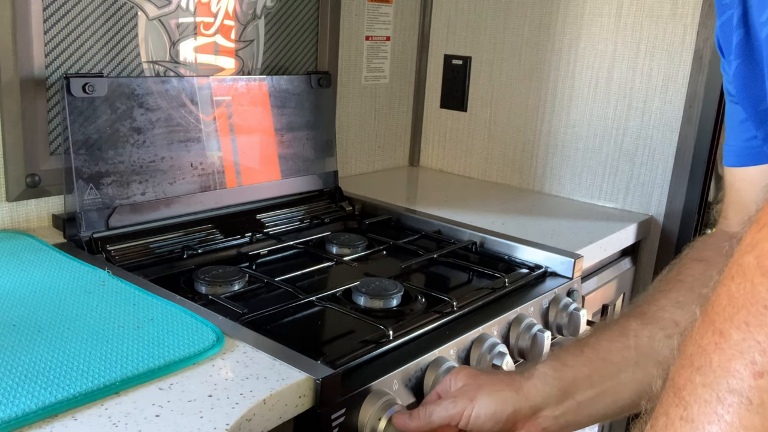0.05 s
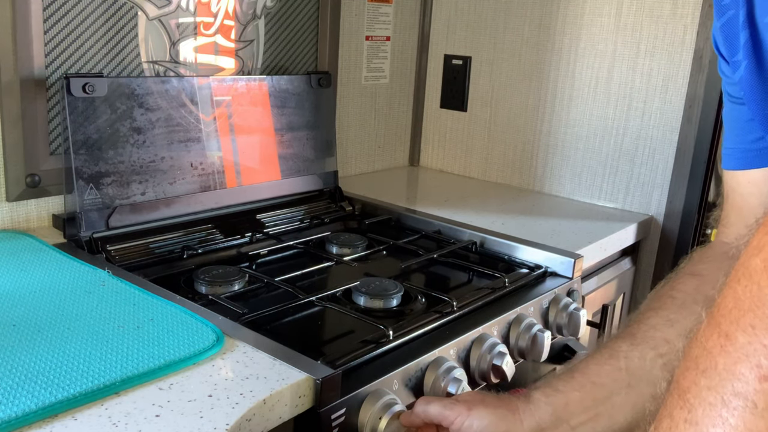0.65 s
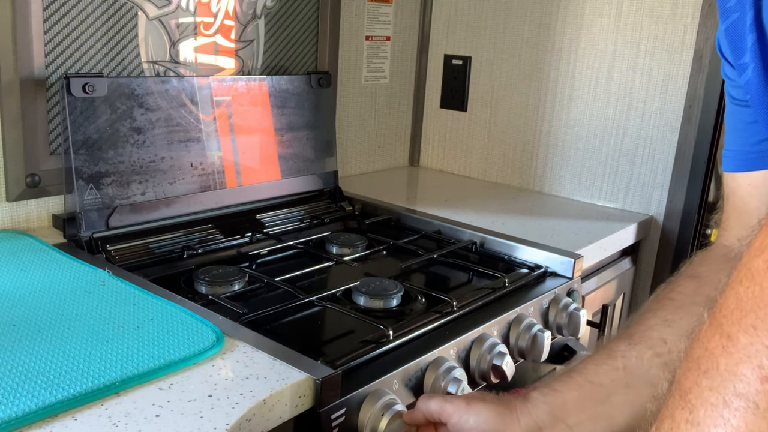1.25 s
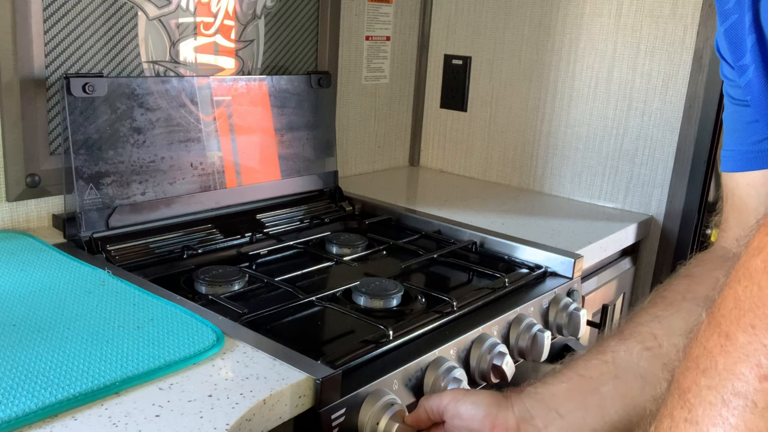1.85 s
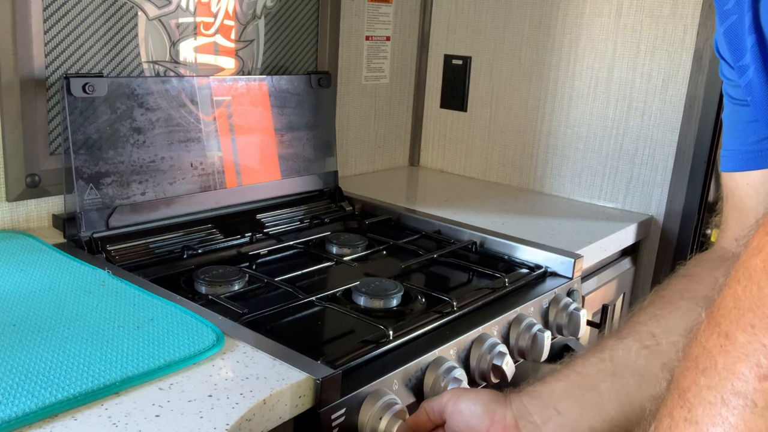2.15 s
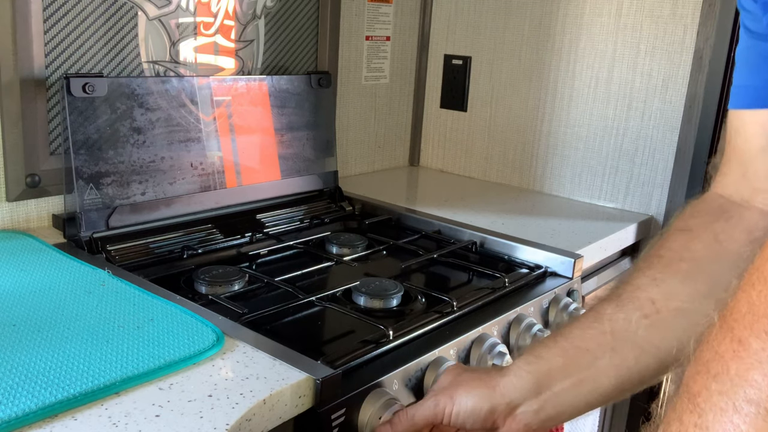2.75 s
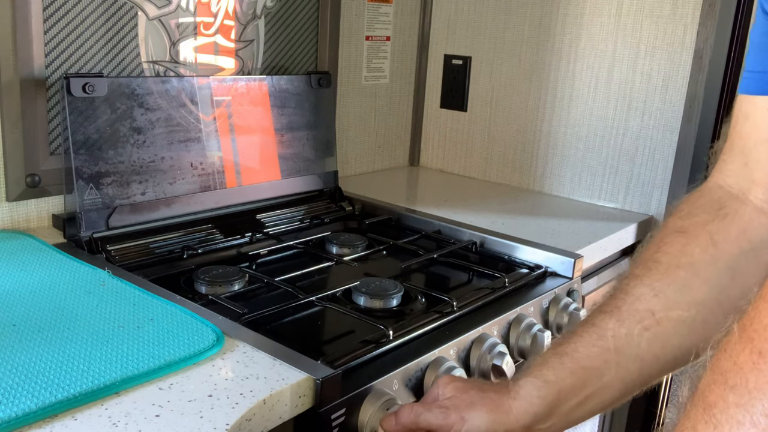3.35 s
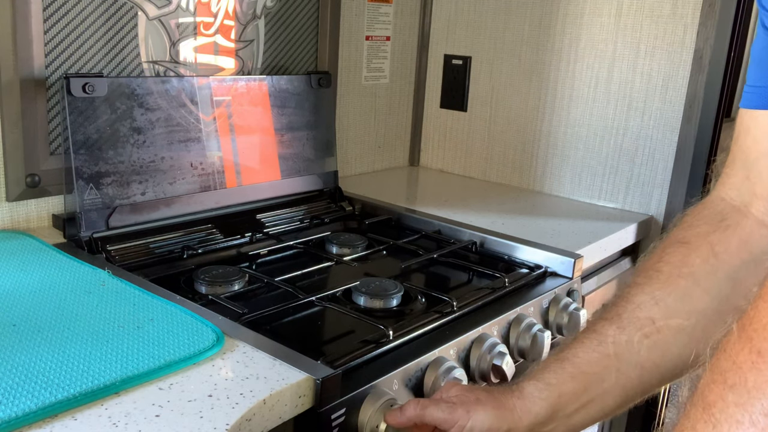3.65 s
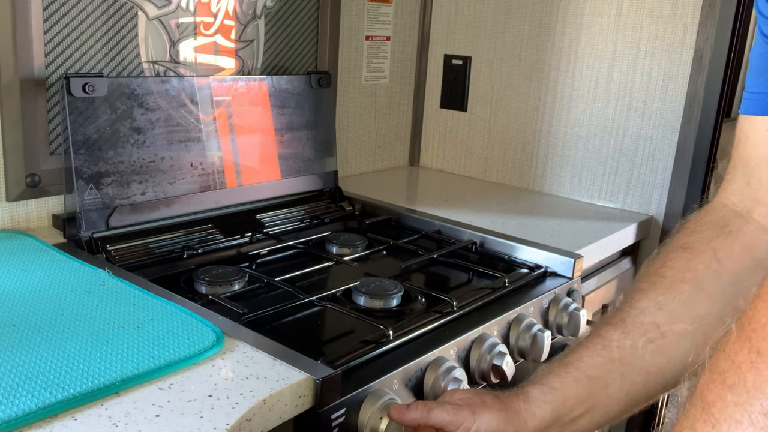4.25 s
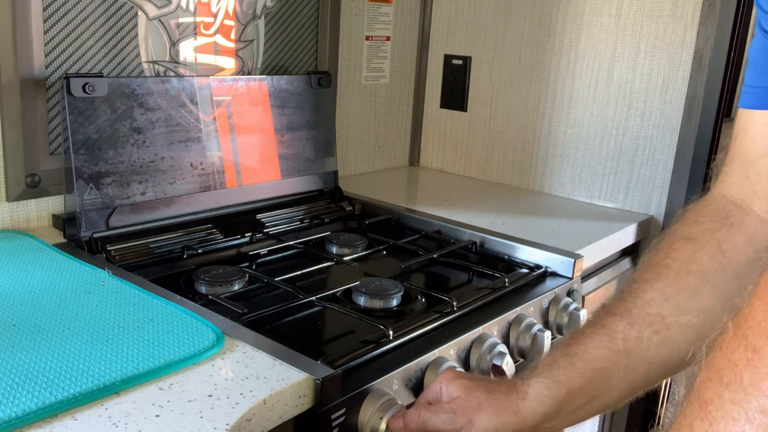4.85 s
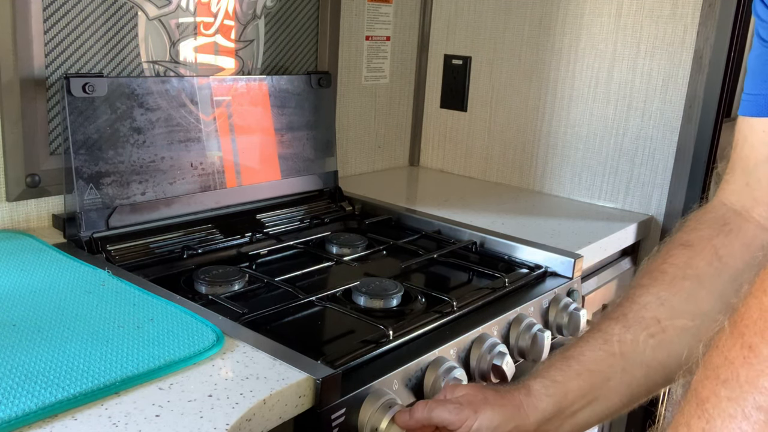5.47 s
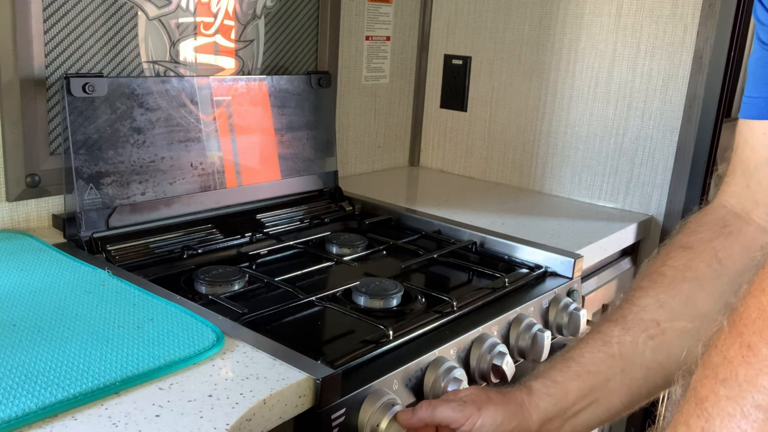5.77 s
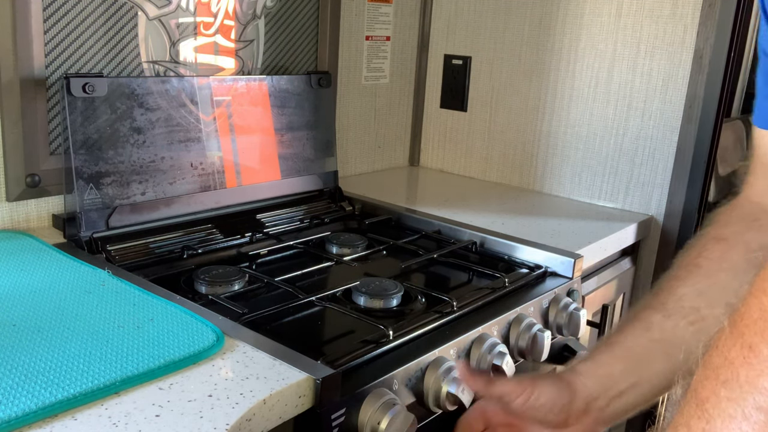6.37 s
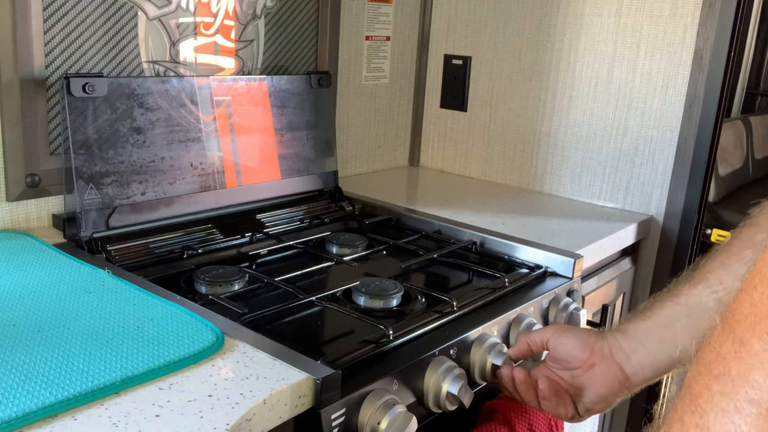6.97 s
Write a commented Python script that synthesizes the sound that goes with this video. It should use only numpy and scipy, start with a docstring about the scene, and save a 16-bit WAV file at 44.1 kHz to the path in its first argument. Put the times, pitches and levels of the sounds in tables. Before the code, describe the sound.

Four sharp, bright snaps of a gas range igniter are heard up close in a cramped kitchen, each with a brief metallic rattle and a slight ring. Softer clicks of the spring resetting come between them, with very faint finger scuffs on a knob. Underneath run a faint burner hiss, a quiet fan and moving air, with low floor thumps and rumble mostly in the middle.

```python
"""Gas range igniter, close up.

In a cramped kitchen, near the microphone, a piezo igniter is snapped four times while a hand holds a
burner knob open. Each hammer blow cracks through the sheet-metal top and leaves the grates ringing;
the spring resets with a light click. Gas hisses softly from the burner. Behind it a fan hums, air
moves, and dull bumps and rumble come through the floor."""
import sys
import numpy as np
from scipy import signal
from scipy.fft import rfft, irfft
from scipy.io import wavfile

SR = 44100
rng = np.random.default_rng(int(sys.argv[2]) if len(sys.argv) > 2 else 0)


def wav_record(signal):
    """Record a signal, one row per channel, as 16-bit PCM in the file named by sys.argv[1]."""
    frames = np.transpose(np.atleast_2d(signal))
    bounded = np.clip(frames, -1, 1)
    # unit amplitude maps onto the largest positive 16-bit level
    quanta = np.round(bounded * 32767).astype(np.int16)
    wavfile.write(sys.argv[1], SR, quanta)


N = 309141
TIME = np.arange(N) / SR

# Hammer blows. Each row: start in seconds; relative level, bass, treble and first crack in dB; favoured
# resonance in Hz, its lift in dB before scaling; favoured grate wire in Hz, its level in dB.
HAMMER_BLOWS = [(0.5052, 0, -1.5, -2, 4, 2530, 3.5, 1443, -61),
                (1.902, -3, 3.5, 1.5, 3, 1880, -1.5, 1478, -61.5),
                (3.8534, -2, -1.5, -0.5, 1.5, 1466, -3, 1445, -55.5),
                (5.9819, -2.5, 0.5, 0, -1.5, 1720, 1, 1254, -54)]
# Light clicks of spring and knob. Each row: as for a hammer blow, without the grate wire.
SPRING_CLICKS = [(1.1931, -24.5, -2, 10, -1, 1870, -3), (2.5172, -36.5, 21, 11.5, -29, 940, 12.5),
                 (3.05, -32.5, 2.5, 11.5, -0.5, 1440, 10.5), (5.0426, -28.5, -13.5, 9, 1.5, 1400, 9.5)]
# Colour of a blow and of a click. Each row: frequency in Hz, gain in dB.
BLOW_COLOUR = [(40, -24), (130, 2), (350, 1), (800, -7.5), (1200, 5), (2000, 1), (3200, -2), (5400, 2.5),
               (7200, -4.5), (10500, 3.5), (13000, -0.5), (14300, -3), (16000, -2.5)]
CLICK_COLOUR = [(100, 7.5), (350, 1.5), (800, -2), (1300, 11.5), (2000, 4), (3200, -8.5), (4800, -4),
                (6000, -12.5), (7300, -14.5), (10500, -10), (13000, -23)]
# Resonances of the range top. Each row: frequency in Hz, width in Hz, lift in dB before scaling.
PANEL_MODES = [(254, 18, 7), (289, 22.3, 5.5), (453, 140, 11), (534, 64, 13), (715, 26, 3.5),
               (716, 77, 12.5), (758, 47, 8), (934, 73, 5), (980, 53, 4.5), (1115, 76, 7.5),
               (1420, 27, 5.5), (1743, 130, 10), (2001, 34, 10.5), (2489, 240, 9), (2928, 47, 12),
               (3443, 24, 8.5), (3780, 268, 8.5), (4104, 48, 7.5), (2605, 12, 5.5), (4665, 39, -12),
               (5100, 234, -1.5), (5950, 327, -2), (6300, 80, 8), (8400, 95, -4), (8040, 59, 6),
               (9600, 318, 0.5), (10540, 180, 6.5), (11970, 400, 7), (13330, 310, 9.5)]
# Ringing wire grates. Each row: frequency in Hz, level in dB, seconds to fall 60 dB.
GRATE_MODES = [(293, -51.5, 0.83), (484, -62, 3), (507, -53, 1.4), (941.4, -68, 1.3), (1260, -66.5, 0.77),
               (1490, -67.5, 1.3)]
# Echoes off the nearby lid, walls and counter. Each row: delay in seconds, relative level in dB.
NEAR_ECHOES = [(.0018, -7.5), (.0036, -13.5), (.0058, -8.5), (.0080, -2)]
# The kitchen's decay. Each row: frequency in Hz, seconds to fall 60 dB.
KITCHEN_T60 = [(120, 0.51), (300, 0.31), (550, 0.27), (900, 0.32), (1500, 0.22), (3500, 0.24), (6000, 0.25),
               (11000, 0.18), (14000, 0.11), (16000, 0.068)]
# Balance of a strike at the microphone. Each row: frequency in Hz, left minus right in dB.
STEREO_LEAN = [(100, 2), (250, 5), (500, 4), (1000, -0.5), (2000, -1.5), (4000, 1.1), (12000, 0.3)]
# The hand on the knob. Each row: start in seconds, level in dB, centre and width in Hz, rise in seconds.
KNOB_RUBS = [(0.203, -60.5, 1310, 248, 0.01), (.27, -75, 2620, 296, 0.032), (2.458, -60, 850, 454, 0.038),
             (4.419, -62.5, 920, 600, 0.014), (6.226, -62, 2410, 170, 0.012), (6.235, -53, 700, 350, 0.013),
             (6.799, -66.5, 2350, 129, 0.013)]
# Spectra of the burner's hiss and high fizz. Each row: frequency in Hz, relative level in dB.
HISS_SPECTRUM = [(2000, -13), (2800, -17.5), (3250, -8.5), (4400, -5.5), (5300, -11), (6100, -18),
                 (7200, -21.5), (9000, -73.5)]
FIZZ_SPECTRUM = [(5500, -35), (7300, -21.5), (8200, -10.5), (9200, -2), (11000, 1), (11700, -3.5),
                 (12500, -11), (14200, -14), (15500, -33.5)]
# Faint whistles of the burner jet. Each row: frequency in Hz, width in Hz, lift in dB.
JET_WHISTLES = [(3210, 130, 3.5), (3790, 64, 3), (4380, 27, 8), (11110, 300, 2.5)]
# Dull bumps in the floor. Each row: time of the peak in seconds, level in dB.
FLOOR_BUMPS = [(1.15, -35.5), (1.832, -34.5), (2.009, -29), (2.117, -26), (2.59, -36), (2.793, -22),
               (3.197, -26), (3.574, -25), (3.764, -27.5), (4.905, -32), (5.338, -27.5), (6.698, -39.5),
               (6.891, -37.5)]
# Weight shifting on the floor. Each row: middle in seconds, half length in seconds, level in dB.
WEIGHT_SHIFTS = [(0.703, 0.49, -48.5), (2.075, 0.26, -42), (3.15, 0.073, -44), (3.58, .13, -46.5),
                 (3.978, 0.14, -44.5), (5.383, 0.12, -44.5)]
# Spectra of the floor's rumble and the moving air. Each row: frequency in Hz, relative level in dB.
RUMBLE_SPECTRUM = [(12, -47), (20, -22), (37, -4), (59, 2.5), (114, -9.5), (184, -19), (210, -20.5),
                   (260, -15.5), (340, -37), (570, -120)]
AIR_SPECTRUM = [(100, -5), (200, -4), (420, -2.5), (700, -3.5), (1000, -9.5), (1500, -12.5), (1950, -11),
                (2300, -28), (3000, -29), (7000, -40.5), (16000, -28.5)]
# Rise and fall of the moving air. Each row: time in seconds, level in dB.
AIR_LEVELS = [(0, -70), (.45, -61), (1.1, -70.5), (1.6, -65.5), (2.4, -65.5), (2.8, -72), (4.2, -61),
              (4.7, -65), (6.3, -62.5), (7, -63)]
# Resonances of the fan housing. Each row: frequency in Hz, width in Hz, relative level in dB.
FAN_MODES = [(280.7, 26, 4.5), (399, 29, -1.5), (447, 23, -6.5), (651, 13, -4.5), (808, 18, -5),
             (982, 11, -10.5), (1225, 14, -8.5)]


def igniter(snap_db=10.5, click_db=9.0, latch_lead_s=0.0036):
    """Up close: the catch slips, the hammer shakes range top and grates; later the spring resets."""
    out = np.zeros((2, N))
    for s, db, *tone, wire_hz, wire_db in HAMMER_BLOWS:
        add(out, s - latch_lead_s, amp(snap_db) * latch())
        add(out, s, strike(BLOW_COLOUR, db + snap_db, *tone, room_db=3.5))
        add(out, s, grate_wire(wire_hz, wire_db) + sum(grate_wire(*mode) for mode in GRATE_MODES))
    for s, db, *tone in SPRING_CLICKS:
        add(out, s, strike(CLICK_COLOUR, db + click_db, *tone, room_db=1))
    return out


def strike(colour, db, bass_db, treble_db, crack_db, ring_hz, ring_db, room_db, lift_scale=0.81):
    """One impact heard through the range top; each favours one broad resonance of the sheet metal."""
    modes = list(PANEL_MODES) + [(ring_hz, 0.14 * ring_hz, ring_db)]

    def shape_db(f):
        bass = bass_db / (1 + (f / 500) ** 2)  # shelf below 500 Hz
        treble = treble_db * f ** 2 / (f ** 2 + 3500 ** 2)  # shelf above 3500 Hz
        return db + read(colour, f) + lift_scale * resonances_db(f, modes) + bass + treble
    t = np.arange(24576) / SR
    impact = clatter(t, room_db) + amp(crack_db) * crack(t)
    return np.array([coloured(channel, lambda f: shape_db(f) + side * read(STEREO_LEAN, f) / 2)
                     for channel, side in zip(impact, (1, -1))])


def crack(t, t60=0.013, rise_s=0.00022, low_cut_hz=650):
    """The hard, bright sound that travels straight from the panel to the microphone."""
    hit = burst(fade(t, t60) * (1 - np.exp(-t / rise_s)))
    thin = signal.lfilter(*signal.butter(1, low_cut_hz, "high", fs=SR), hit)
    bright = thin - 0.51 * np.r_[0, thin[:-1]]  # the lows take longer to leave the panel
    return np.array([np.roll(bright, 3), bright])  # reaches the right side first


def clatter(t, room_db, echo_t60=0.016, rattle_t60=0.13, room_rise_s=0.0077, bass_rise_s=0.0095):
    """What follows the crack: nearest echoes, sheet-metal rattle and the small kitchen's tail."""
    mean_t60 = np.mean([t60 for hz, t60 in KITCHEN_T60])
    echoes = [(db, np.roll(fade(t, echo_t60), round(delay * SR))) for delay, db in NEAR_ECHOES]
    rattle = (room_db - 5, fade(t, rattle_t60))
    tail = (room_db, fade(t, mean_t60) * (1 - np.exp(-t / room_rise_s)))
    power = sum((amp(db) * shape / np.linalg.norm(shape)) ** 2 for db, shape in echoes + [rattle, tail])
    envelope = np.sqrt(power)
    mid, side = burst(envelope), amp(-0.5) * burst(envelope)
    stereo = np.linalg.norm(envelope) * np.array([mid + side, mid - side]) / np.sqrt(2)
    hz, age, bands = signal.stft(stereo, SR, nperseg=256)
    bands *= fade(age, read(KITCHEN_T60, hz)[:, None]) / fade(age, mean_t60)  # each at its own speed
    bands *= 1 - np.exp(-age / bass_rise_s - (hz[:, None] / 330) ** 2)  # slow build-up below 330 Hz
    return signal.istft(bands, SR, nperseg=256)[1][:, :len(t)]


def grate_wire(hz, db, t60=1.44, split_hz=7, twin_db=-7):
    """One grate wire ringing on, beating against a slightly sharper twin."""
    t = np.arange(2 * SR) / SR
    twin_hz = hz + split_hz * rng.uniform(0.5, 1.8)
    ring, twin = [np.sin(2 * np.pi * (f * t + rng.random() + rng.uniform(0, 0.52, (2, 1))))
                  for f in (hz, twin_hz)]
    return amp(db) * fade(t, t60) * (ring + amp(twin_db) * twin)


def latch(gain_db=-10.5, t60=0.02, dull_hz=4500):
    """A tiny dull scrape of the catch letting go."""
    def shape_db(f):
        return read(BLOW_COLOUR, f) + peak_db(f, 0, dull_hz) / 2
    scrape = fade(np.arange(4096) / SR, t60)
    return amp(gain_db) * np.array([coloured(burst(scrape), shape_db) for channel in range(2)])


def knob_rubs():
    """Fingers and knob scuff and squeak faintly."""
    out, t = np.zeros((2, N)), np.arange(16384) / SR
    for s, db, hz, width, rise in KNOB_RUBS:
        envelope = t / rise * np.exp(1 - t / rise)
        add(out, s, amp(db) * envelope * noise(lambda f: peak_db(f, hz, width), 0.17, size=len(t)))
    return out


def burner(start_db=-65.5, end_db=-72.5, purge_mid_s=3.53, purge_ease_s=0.8, fizz_db=-66, flutter_db=1.5):
    """Gas hisses and whistles faintly, weakening as the line is purged, under a high fluttering fizz."""
    purged = (1 + np.tanh((TIME - purge_mid_s) / purge_ease_s)) / 2
    hiss = noise(lambda f: read(HISS_SPECTRUM, f) + resonances_db(f, JET_WHISTLES), 0.1)
    flutter = noise(lambda f: peak_db(f, hz=27, width=15), 0.68)[0]
    fizz = noise(lambda f: read(FIZZ_SPECTRUM, f) + resonances_db(f, JET_WHISTLES), 0.21)
    return amp(start_db + (end_db - start_db) * purged) * hiss + amp(fizz_db + flutter_db * flutter) * fizz


def floor_bumps(floor_hz=73.7, spread=0.094, width_s=0.0075, rebound_s=0.0452, rebound_db=-13.5):
    """Each bump swings the floor for a cycle or two, with a weaker upper mode, and rebounds once."""
    out, t = np.zeros((2, N)), np.arange(-SR // 20, SR // 20) / SR
    envelope = signal.windows.tukey(len(t)) / np.cosh(t / width_s)
    for s, db in FLOOR_BUMPS:
        for delay, drop_db in ((0, 0), (rebound_s, rebound_db)):
            hz = floor_hz * np.exp(spread * rng.standard_normal())
            phase = rng.random() + 0.29 * rng.standard_normal((2, 1))  # skewed between left and right
            swing = np.sin(2 * np.pi * (hz * t + phase))
            upper = amp(-15) * np.sin(2 * np.pi * (1.87 * hz * t + rng.random((2, 1))))
            add(out, s + delay + t[0], amp(db + drop_db) * envelope * (swing + upper))
    return out


def floor_rumble(rest_db=-58, lumpy_db=3):
    """A lumpy low rumble underfoot that swells with every shift of weight."""
    swells = sum(amp(db) ** 2 * np.exp(-((TIME - s) / half) ** 2) for s, half, db in WEIGHT_SHIFTS)
    lumps = unit_rms(amp(lumpy_db * wander(rate_hz=11)))
    return np.sqrt(amp(rest_db) ** 2 + swells) * lumps * noise(lambda f: read(RUMBLE_SPECTRUM, f), 0.44)


def moving_air(gust_db=-0.5):
    """Room tone: a soft, unsteady rush of air all around the microphone."""
    level_db = np.interp(TIME, *np.transpose(AIR_LEVELS)) + gust_db * wander(rate_hz=13)
    return amp(level_db) * noise(lambda f: read(AIR_SPECTRUM, f), -0.35)


def fan(hum_db=-69, swell_s=0.76, swell_db=-59, rest_db=-75.5, rise_db_per_s=23.5, fall_db_per_s=5.5):
    """A fan housing hums in the background; its lowest note swells early, then sinks back."""
    low, *upper = [amp(db) * noise(lambda f: peak_db(f, hz, width), -0.39) for hz, width, db in FAN_MODES]
    since = TIME - swell_s
    swell = amp(swell_db + np.minimum(rise_db_per_s * since, -fall_db_per_s * since))
    return np.hypot(swell, amp(rest_db)) * low + amp(hum_db) * sum(upper)


def amp(db):
    """Decibels to gain."""
    return 10 ** (np.asarray(db) / 20)


def unit_rms(x):
    """Scales to rms 1."""
    return x / np.sqrt(np.mean(x ** 2) + 1e-20)


def fade(t, t60):
    """Falls 60 dB in t60 seconds."""
    return np.exp(-np.log(1000) * t / t60)


def read(points, hz):
    """Reads a table on a log-frequency axis."""
    f, value = np.transpose(points)
    return np.interp(np.log(hz + 1), np.log(f + 1), value)


def peak_db(f, hz, width):
    """A resonance with steep skirts, 6 dB down at hz +/- width."""
    return -20 * np.log10(1 + ((f - hz) / width) ** 2)


def resonances_db(f, modes):
    """Bell-shaped lifts and dips, summed in dB."""
    return sum(lift / (1 + (2 * (f - hz) / width) ** 2) for hz, width, lift in modes)


def noise(shape_db, likeness, size=N):
    """Stereo noise of rms 1 with the spectrum shape_db(Hz); likeness is the left-right correlation."""
    left, other = rng.standard_normal((2, size))
    right = likeness * left + np.sqrt(1 - likeness ** 2) * other
    gain = amp(shape_db(np.fft.rfftfreq(size, 1 / SR)))
    return unit_rms(irfft(rfft([left, right]) * gain, size))


def wander(rate_hz):
    """A slow random drift of rms 1."""
    return noise(lambda f: peak_db(f, 0, rate_hz), 1)[0]


def burst(envelope):
    """A dense scatter of tiny impacts under an envelope, with energy 1."""
    x = envelope * rng.standard_normal(len(envelope))
    return x / np.linalg.norm(x)


def coloured(x, shape_db, size=8192):
    """Minimum-phase filter with the gain shape_db(Hz): nothing sounds before the blow."""
    log_gain = np.log(amp(shape_db(abs(np.fft.fftfreq(size, 1 / SR)))))
    response = np.exp(np.conj(signal.hilbert(log_gain)))
    taps = np.fft.ifft(response).real[:size // 2]
    return signal.fftconvolve(x, taps)[:len(x)]


def add(mix, s, sound):
    """Mixes a sound in at s seconds."""
    part = mix[:, round(s * SR):][:, :sound.shape[-1]]
    part += sound[..., :part.shape[1]]


def scene():
    """The kitchen as heard from beside the range."""
    return igniter() + knob_rubs() + floor_bumps() + floor_rumble() + moving_air() + fan() + burner()


def record(dry):
    """The microphone chain rounds off the peaks softly, then cuts the top above 15.6 kHz."""
    low_pass = signal.firwin(255, 15600, window=("kaiser", 9), fs=SR)
    return signal.oaconvolve(np.tanh(dry), low_pass[None], "same")


dry = scene()
out = record(dry)
wav_record(out)
```